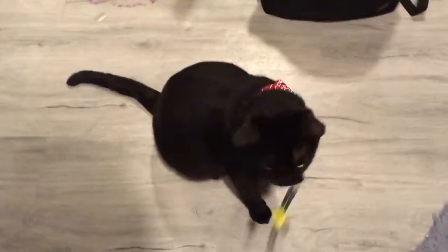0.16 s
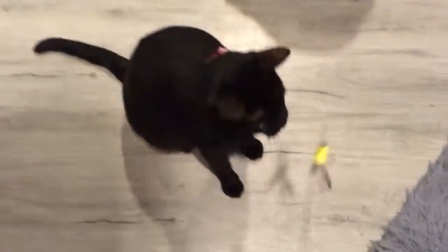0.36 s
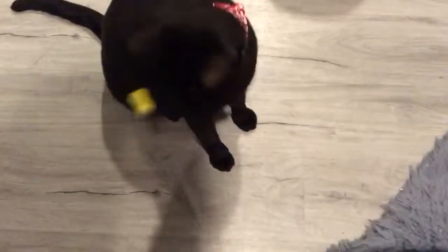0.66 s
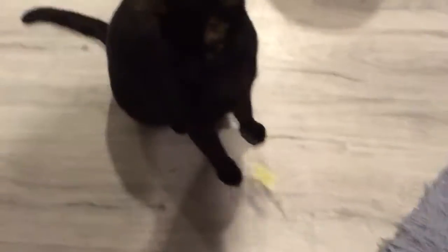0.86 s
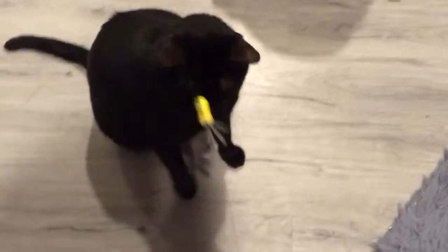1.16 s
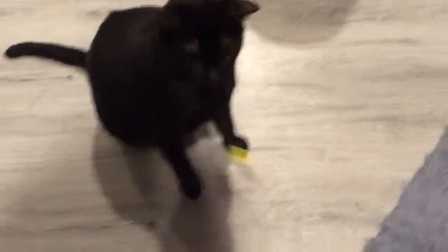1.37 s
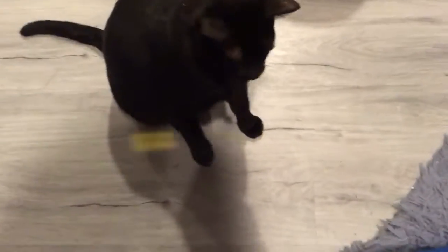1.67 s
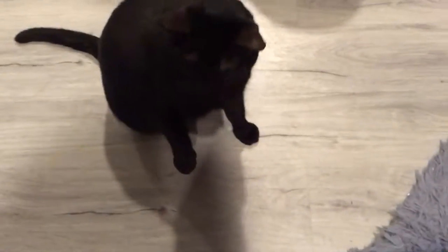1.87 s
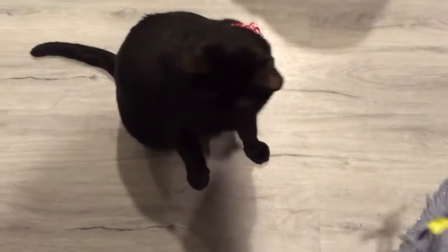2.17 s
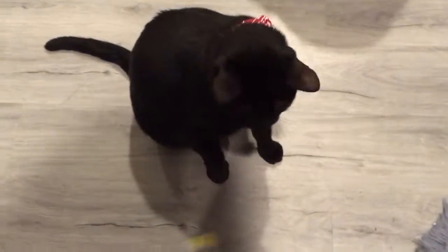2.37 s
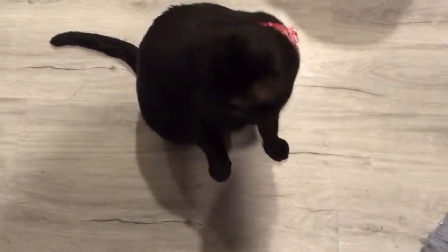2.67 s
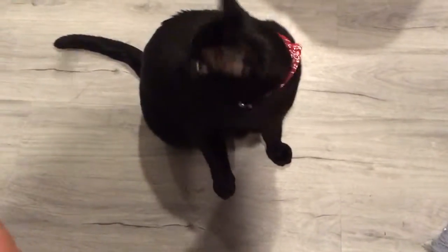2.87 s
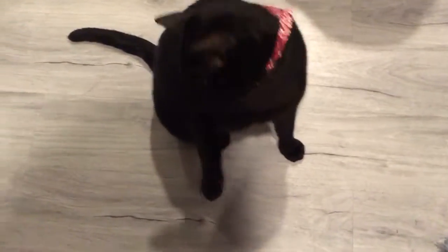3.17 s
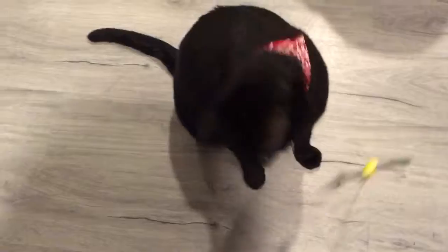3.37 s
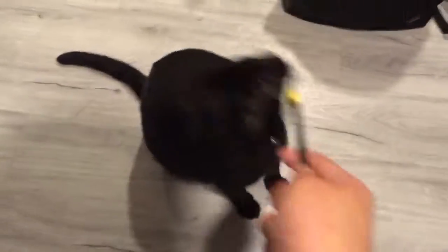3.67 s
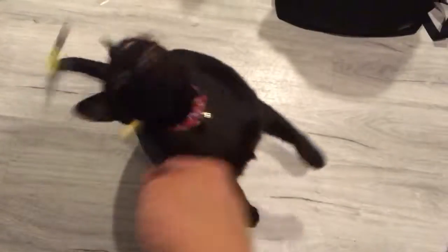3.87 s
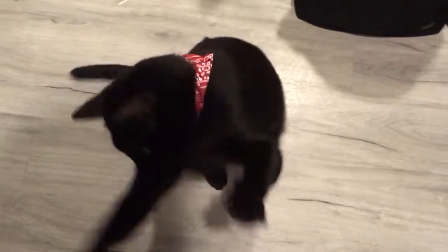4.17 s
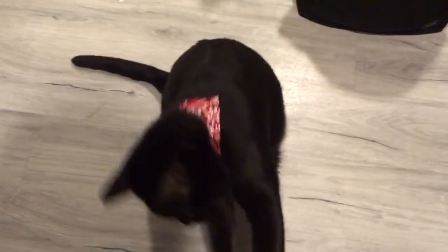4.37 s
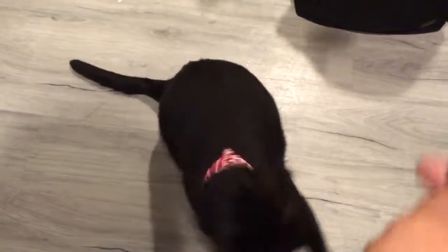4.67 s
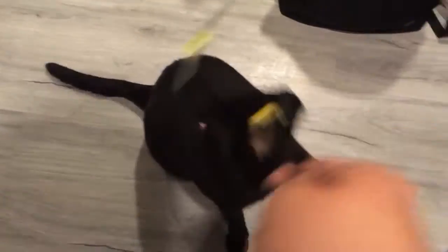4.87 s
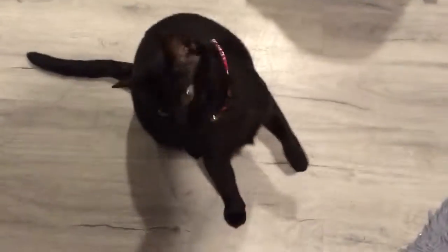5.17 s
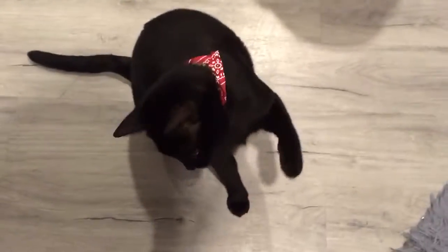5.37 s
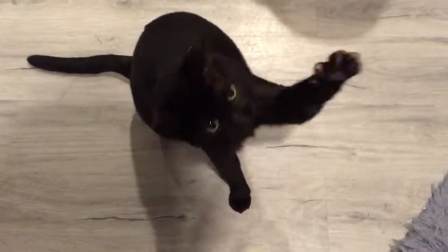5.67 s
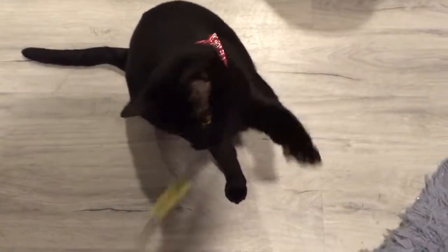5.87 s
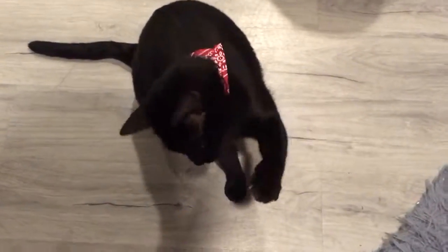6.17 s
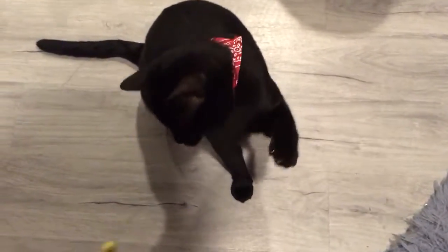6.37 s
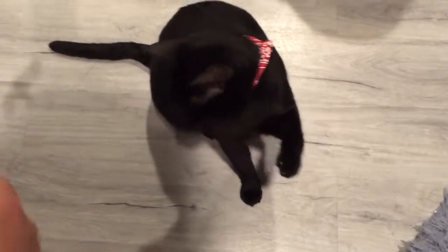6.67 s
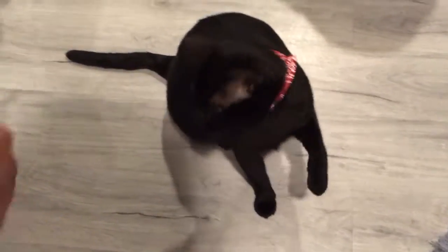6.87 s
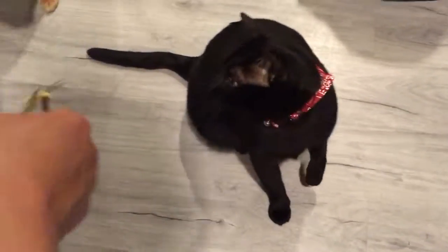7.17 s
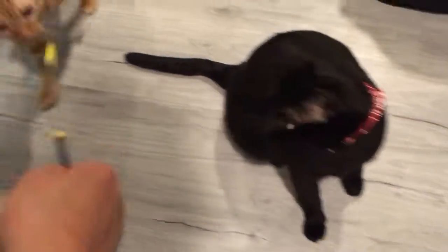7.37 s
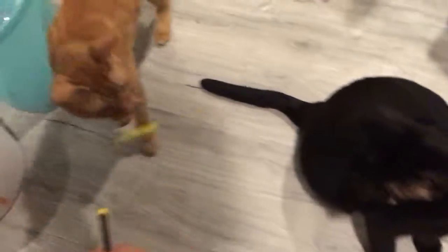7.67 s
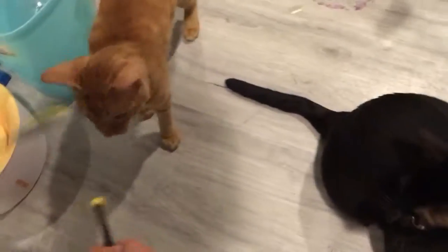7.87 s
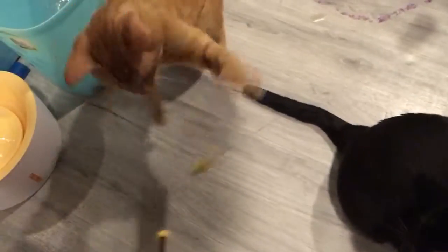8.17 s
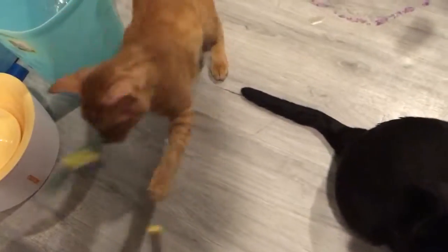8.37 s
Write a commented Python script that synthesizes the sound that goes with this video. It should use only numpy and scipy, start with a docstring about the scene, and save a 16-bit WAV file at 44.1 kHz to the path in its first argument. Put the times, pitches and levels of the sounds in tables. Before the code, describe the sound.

A small collar bell jingles in short, muffled shakes among dry taps and light scratches on a hard floor, over a low appliance hum.

```python
"""A small room with a laminate floor, where cats bat at a teaser toy close to a hand-held phone microphone.
Nearest is a slotted collar bell: its pellet strikes three groups of damped modes, with small rebounds.
Grainy noise bursts make the taps of toy and paws and some noisy clacks of the bell; claws add short
scratchy notes, hard landings knock the board, fur and string crackle and paws slide as lumpy noise.
Further back an appliance drones as resonant noise, with one low thump, under faint hiss and room echoes."""
import sys
import numpy as np
from scipy import signal
from scipy.fft import rfft, irfft
from scipy.io import wavfile
from scipy.ndimage import uniform_filter1d

SR = 44100
rng = np.random.default_rng(int(sys.argv[2]) if len(sys.argv) > 2 else 0)


def unload_audio(sound):
    """Save the sound as a 16-bit wav file, at the path given as the first command line argument."""
    columns = np.transpose(np.atleast_2d(sound))
    # keep every value between -1 and 1, then stretch to whole-number steps
    steps = np.round(np.clip(columns, -1, 1) * 32767)
    wavfile.write(sys.argv[1], SR, steps.astype(np.int16))


N = 375732  # samples


def gain_of(db):
    """Amplitude factor of a level in dB."""
    return 10 ** (np.asarray(db) / 20)


def evened(x):
    """Scales a signal to rms 1."""
    return x / np.sqrt(np.mean(x ** 2) + 1e-20)


def read(points, hz):
    """Reads a (frequency, value) curve, straight along log frequency."""
    point_hz, value = np.transpose(points)
    return np.interp(np.log(hz + 1), np.log(point_hz + 1), value)


def add(mix, start_s, sound):
    """Adds a sound to the mix in place, cut off where the mix ends."""
    part = mix[round(start_s * SR):][:len(sound)]
    part += sound[:len(part)]


def level(rows):
    """Gain over time of a (time_s, level_db) curve, near silent (-200 dB) outside it."""
    time_s, level_db = np.transpose(rows)
    return gain_of(np.interp(np.arange(N) / SR, time_s, level_db, -200, -200))


def coloured(x, points):
    """Shapes a signal by a (frequency_hz, level_db) spectrum, then scales it to rms 1."""
    hz = np.fft.rfftfreq(N, 1 / SR)
    return evened(irfft(rfft(x) * gain_of(read(points, hz)), N))


# resonances of the appliance drone: frequency_hz, width_hz (between the -6 dB points), share_db (relative)
DRONE_RESONANCES = [(47.4, 20, -60), (57.5, 5.9, -51.5), (69.4, 19, -51), (88.66, 3.8, -54),
                    (114.2, 11, -57), (139.6, 55, -60.5), (175.55, 6.3, -59), (203.8, 33, -66),
                    (242, 15, -65), (263.3, 6.8, -70), (296.5, 2.6, -67.5), (366.7, 6.5, -78)]
# low hum level, including a low handling or paw thump near 5.86 s: time_s, level_db (rms)
LOW_HUM_LEVEL = [(0.0, -46.5), (.8, -47.5), (2, -47), (4.08, -47.5), (5.4, -47.5), (5.74, -49.5),
                 (5.86, -43), (6, -46.5), (8.52, -46)]


def low_hum():
    """Noise excites each of the appliance's resonances, so the hum wavers; a brief rise makes the low thump."""
    hz = np.fft.rfftfreq(N, 1 / SR)
    power = np.zeros(len(hz))
    for mode_hz, width_hz, share_db in DRONE_RESONANCES:
        shape = 1 / (1 + (2 * (hz - mode_hz) / width_hz) ** 2) ** 2
        power += gain_of(2 * share_db) / width_hz * shape  # twice the dB makes a power
    hum = irfft(rfft(rng.standard_normal(N)) * np.sqrt(power), N)
    return level(LOW_HUM_LEVEL) * evened(hum)


# colour of the room's hiss: frequency_hz, level_db (relative, per Hz)
AIR_SPECTRUM = [(180, -15), (300, -3), (370, -11), (420, -7.5), (700, -17.5), (1050, -11), (2200, -23.5),
                (3700, -29), (5000, -32.5), (7000, -28), (10000, -29), (14500, -26.5), (16000, -20.5)]


def air():
    """Steady coloured noise: the faint hiss of the room."""
    air_db = -62  # rms
    return gain_of(air_db) * coloured(rng.standard_normal(N), AIR_SPECTRUM)


# how fast the room's echoes die in each band: frequency_hz, t60_s
ROOM_DECAY = [(1000, 0.35), (2600, 0.27), (7000, 0.2), (15000, 0.16)]


def room(x):
    """Sparse echoes of random sign, one in every 20 samples, each band dying at its own speed."""
    echoes = np.zeros(SR // 2)
    at = np.arange(200, SR // 2 - 20, 20)
    echoes[at + rng.integers(0, 20, at.shape)] = rng.choice([-1., 1.], at.shape)
    hz, t, bands = signal.stft(echoes, SR, nperseg=256)
    decay = gain_of(-60 * t / read(ROOM_DECAY, hz)[:, None])
    tail = signal.istft(bands * decay, SR, nperseg=256)[1]
    return signal.fftconvolve(x, tail / np.linalg.norm(tail))[:N]


# paws and bodies shuffle and slide over the floor: time_s, level_db (rms)
SLIDE_LEVEL = [(0, -64), (.24, -62), (.4, -66), (1.09, -68), (1.8, -64.5), (2.3, -70), (2.42, -64),
               (2.55, -68.5), (3.05, -67.5), (3.18, -64), (3.35, -66.5), (4.37, -67.5), (5.89, -64),
               (6.1, -67.5), (7.7, -65), (8.03, -63), (8.08, -51.5), (8.17, -55.5), (8.25, -63),
               (8.52, -62)]
# colour of the sliding: frequency_hz, level_db (relative, per Hz)
SLIDE_SPECTRUM = [(180, -45), (300, -4.5), (537, -3), (656, -2), (2000, -4), (5080, -14.5), (16000, -37.5)]


def slide():
    """Friction noise that comes in soft lumps under the stroke."""
    lumps = gain_of(2.0 * evened(uniform_filter1d(rng.standard_normal(N), 180)))
    friction = coloured(rng.standard_normal(N), SLIDE_SPECTRUM)
    return level(SLIDE_LEVEL) * evened(lumps * friction)


# fur and string brushing: time_s, level_db (rms, relative to BRUSH_DB)
BRUSH_LEVEL = [(0, -67), (.8, -69), (1, -82), (1.3, -70.5), (1.85, -69.5), (2.73, -82), (3.66, -69.5),
               (4.01, -74), (4.9, -62), (5.15, -71), (5.4, -65), (5.9, -71.5), (6.03, -65), (6.3, -85),
               (6.5, -65.5), (6.76, -72.5), (7.5, -69.5), (7.86, -72.5), (7.95, -65), (8.11, -63),
               (8.18, -56.5), (8.29, -65), (8.52, -67.5)]
# colour of the brushing: frequency_hz, level_db (relative, per Hz)
BRUSH_SPECTRUM = [(1500, -37.5), (4000, 2.5), (7000, 3), (10000, 3), (13000, 4), (16000, -0.5)]
BRUSH_DB = 2.0


def brush():
    """Fine hiss with sparse crackles of hairs and string, each dying away exponentially."""
    crackles_per_s, crackle_fade_s = 25., 0.0013
    size_db = 4.0 * np.minimum(rng.exponential(1, N), 3)
    crackle = gain_of(size_db) * (rng.random(N) < crackles_per_s / SR)
    crackle = signal.lfilter([1], [1, -np.exp(-1 / (crackle_fade_s * SR))], crackle)
    hiss = rng.standard_normal(N) * (1 + .9 * crackle)
    return gain_of(BRUSH_DB) * level(BRUSH_LEVEL) * coloured(hiss, BRUSH_SPECTRUM)


# harder landings knock the floorboard: start_s, level_db (gain on all the board's modes)
BOARD_KNOCKS = [(0.796, -43), (4.558, -57), (4.57, -46), (4.592, -55), (6.332, -52), (6.355, -43),
                (7.977, -47), (7.984, -49)]
# modes of the floorboard: frequency_hz, level_db (relative), t60_s
BOARD_MODES = [(332, 0, 0.013), (550, -13, 0.01), (915, 3, 0.012), (1427, 0.5, 0.013), (2310, -2, 0.016)]


def knocks():
    """The same dull, quickly damped board modes sound at every hard landing."""
    out, t = np.zeros(N), np.arange(2000) / SR
    board = sum(gain_of(db - 60 * t / t60) * np.sin(2 * np.pi * hz * t) for hz, db, t60 in BOARD_MODES)
    for start_s, level_db in BOARD_KNOCKS:
        add(out, start_s, gain_of(level_db) * board)
    return out


# claws touch the floor: start_s, level_db (relative to CLAW_DB), pitch_hz
CLAW_TOUCHES = [(.91, -56, 6300), (0.966, -46, 3500), (1.199, -52, 4660), (1.308, -45, 4320),
                (1.57, -50, 3100), (1.606, -54, 2400), (2.138, -54, 1710), (3.352, -51, 9100),
                (3.638, -48, 3870), (4.12, -45.5, 2770), (4.135, -48, 1190), (4.687, -52, 9300),
                (4.882, -44.5, 1950), (5.35, -50, 2740), (5.416, -46.5, 3760), (6.023, -37, 8600),
                (6.304, -49, 3700), (6.86, -55, 9200), (7.65, -55.5, 6500), (8.324, -50, 3668)]
CLAW_DB = 3.0


def claws():
    """One short scratchy note a touch: a damped tone roughened by the floor's grain."""
    out, t = np.zeros(N), np.arange(1000) / SR
    rise_s, t60_s = 0.002, 0.024
    for start_s, level_db, pitch_hz in CLAW_TOUCHES:
        grain = 1 + .6 * evened(uniform_filter1d(rng.standard_normal(len(t)), 30))
        fade = gain_of(level_db + CLAW_DB - 60 * t / t60_s)
        rise = 1 - np.exp(-t / rise_s)
        add(out, start_s, fade * rise * grain * np.sin(2 * np.pi * pitch_hz * t))
    return out


def faint_taps():
    """Small touches fall by chance through the play, as rows like the clear taps."""
    per_s, loudest_db, body_db = 3.5, -63, -12
    bright_hz, contact_ms = (5500, 14500), (1.5, 9)  # ranges
    when, size, bright, touch = rng.random((round(per_s * N / SR), 4)).T
    return list(zip(when * N / SR,
                    loudest_db - 6 * size,
                    np.interp(bright, (0, 1), bright_hz),
                    body_db + 0 * when,
                    np.interp(touch ** 2, (0, 1), contact_ms)))  # the square favours short touches


# toy and paws on the floor, and some noisy clacks of the bell:
# start_s, level_db (rms in 3400 Hz at the brightest, before the shell's colour),
# brightest_hz, body_db (at 2200 Hz, relative to the brightest), contact_ms
CLEAR_TAPS = [(0.0185, -59, 11400, -30, 2.9), (0.2676, -55.5, 12000, -18, 21),
              (0.2894, -49.5, 13800, -24, 11), (0.4195, -56, 5900, -23, 6), (0.664, -57.5, 12000, -8, 2.4),
              (0.7993, -38.5, 13800, -12, 14), (0.8085, -34.5, 13800, -23, 6.1),
              (0.9305, -60, 13800, -19, 2.4), (0.9605, -55, 10120, -17, 5.4), (1.0388, -64, 8900, -11, 2),
              (1.2012, -60, 12500, -28, 2.6), (1.247, -58.5, 13800, -14, 22), (1.265, -60, 12500, -17, 30),
              (1.4429, -65, 10000, -3, 3.4), (2.1403, -57, 4870, 0, 5.8), (2.2167, -61, 13800, -21, 2.3),
              (2.4167, -64.5, 8900, 7.5, 2.3), (2.4267, -62, 13800, -3, 1.9), (2.6812, -61, 5900, -17, 10),
              (2.7073, -62, 11000, -14, 2.9), (2.7963, -60, 11400, -21, 1.3),
              (2.992, -60.5, 5900, -29, 2.3), (3.388, -61, 10000, -22, 2.8), (3.492, -57, 13800, -20, 1.5),
              (3.6143, -63, 13800, -15, 1.9), (3.645, -53, 13800, -9, 11), (3.683, -59, 13800, -0.5, 7.2),
              (3.9224, -43, 6450, -35, 2), (4.0806, -56, 13800, -29.5, 2.4), (4.0974, -34, 13800, -27, 5),
              (4.192, -58, 13800, -13, 5.9), (4.3487, -50.5, 11300, -27, 6.4), (4.546, -54, 12500, -6, 1.3),
              (4.558, -40.5, 5860, -7, 6.8), (4.5655, -43, 13800, -8.5, 7),
              (4.593, -31.5, 13500, -8.5, 6.7), (4.737, -45.5, 5900, -46, 9.9),
              (5.198, -39.5, 5740, -44, 9.7), (5.3486, -54.5, 8900, -3, 7.1),
              (5.361, -58.5, 11400, -3.5, 3.6), (5.452, -57, 5900, -15, 2.7),
              (5.8203, -55.5, 13800, -23, 2.8), (5.9645, -58, 12000, -19, 7.6),
              (5.9868, -58, 13800, -23, 7.4), (6.024, -51.5, 8900, -6.5, 8.5),
              (6.0482, -48.5, 13800, -15.5, 8.6), (6.2009, -59, 13800, -21.5, 2),
              (6.2426, -63, 13800, -12, 3), (6.2843, -63.5, 5900, -19, 2.1),
              (6.3114, -54.5, 11400, -24.5, 1.5), (6.3327, -18, 11000, -24.5, 4.8),
              (6.355, -32.5, 11000, -12, 3.3), (6.3704, -55, 11400, -24, 8), (6.6633, -65, 13800, 2, 2.1),
              (6.8773, -57, 5850, -17.5, 2.4), (6.9307, -62, 14100, -27, 1.8),
              (7.3166, -53, 8800, -26, 2.6), (7.3797, -60, 11300, -27, 8.4), (7.5093, -54, 11400, -29, 1.3),
              (7.7863, -59, 13800, -22, 10), (7.9748, -38, 12000, -11, 9.26),
              (8.0012, -40, 13000, -11.5, 4.9), (8.037, -50, 11400, -7, 6.9), (8.055, -53, 5900, -2, 8.6),
              (8.3832, -61.5, 11400, -14, 3.5), (8.4919, -55, 13800, -21, 3),
              (8.5068, -49.5, 6100, -20, 11)]
# a hollow shell like the toy's colours every tap: frequency_hz, level_db
SHELL_COLOUR = [(2300, 0), (3600, -2), (6300, 1.5), (8500, -1.5), (11600, 0.5), (14000, -3), (16000, 3)]
TAP_FALL_DB = 12  # per octave above the brightest band


def taps(landings):
    """Light bodies tap without a clear ring: a grainy chatter while they touch, then a quick end."""
    out, t, hz = np.zeros(N), np.arange(4096) / SR, np.fft.rfftfreq(4096, 1 / SR)
    end_t60_s = 0.018
    lead = 64  # samples of room ahead of the burst for the filter's spread
    for start_s, level_db, bright_hz, body_db, contact_ms in landings:
        contact_s = contact_ms / 1000
        chatter = gain_of(2.0 * rng.standard_normal(len(t) // 32).repeat(32))
        held = t / contact_s  # in contact times
        fade_db = -4.0 * held - 60 * np.maximum(t - contact_s, 0) / end_t60_s
        touch = (1 - np.exp(-held / .12)) * gain_of(fade_db)
        burst = rng.standard_normal(len(t)) * chatter * touch
        # rms 1 in each 3400 Hz of the noise during the contact
        burst /= np.sqrt(np.mean(burst[:round(contact_s * SR)] ** 2) * 3400 / (SR / 2))
        tone = [(300, body_db - 23), (900, body_db - 7.5), (2200, body_db), (bright_hz, 0),
                (16000, -TAP_FALL_DB * np.log2(16000 / bright_hz))]
        tone_db = read(tone, hz) + read(SHELL_COLOUR, hz)
        tap = irfft(rfft(burst) * gain_of(tone_db))
        add(out, start_s - lead / SR, gain_of(level_db) * np.roll(tap, lead))
    return out


# spells in which the pellet also rolls about with faint strikes:
# start_s, end_s, low_ring_db (middle of the scatter), freedom (from the fur, a mean factor on t60)
ROLLING_SPELLS = [(0.099, .16, -72, .7), (0.304, .49, -72, .7), (1.534, 1.64, -66, 0.4),
                  (2.26, 2.36, -69, 0.51), (2.851, 3.4, -63, 0.48), (3.523, 3.76, -69, 0.85),
                  (3.846, 4.359, -65, .8), (4.73, 5.079, -60, .85), (5.151, 5.554, -67, .72),
                  (5.72, 6.27, -66, 0.83), (6.487, 6.704, -72, 0.68)]


def rolling():
    """Faint strikes at chance moments of each rolling spell, as rows like the clear strikes."""
    per_s, scatter_db = 16, 4
    high_ring_db = -7.5  # under the low ring, before the scatter
    rows = []
    for start_s, end_s, ring_db, _ in ROLLING_SPELLS:
        length_s = end_s - start_s
        when = rng.random(round(per_s * round(length_s, ndigits=1)))
        low_db, high_db = ring_db + scatter_db * rng.standard_normal((len(when), 2)).T
        rows += zip(start_s + when * length_s, low_db, high_db + high_ring_db)
    return rows


def freedom(start_s):
    """How freely the bell hangs in the spell last begun, varied by a share from strike to strike."""
    scatter = .15
    spell = max(np.searchsorted([row[0] for row in ROLLING_SPELLS], start_s) - 1, 0)
    return ROLLING_SPELLS[spell][-1] * (1 + scatter * rng.standard_normal())


# clear pellet strikes: start_s, low_ring_db, high_ring_db (levels before the flutter)
BELL_STRIKES = [(0.1151, -63, -74), (0.313, -55, -73), (0.4189, -63, -74), (0.4683, -63, -71),
                (1.5467, -54, -68), (1.558, -58, -71), (1.6316, -52, -67), (2.268, -57, -78),
                (2.9273, -50.5, -70), (2.9424, -51, -56), (2.9606, -57, -81), (2.9798, -51.5, -51.5),
                (2.9931, -54, -76), (3.0884, -66, -75), (3.1073, -69, -80), (3.1642, -68.5, -60),
                (3.18, -56, -65), (3.245, -61, -63), (3.296, -51.5, -60), (3.532, -53, -75),
                (3.5754, -74, -59), (3.638, -55, -43), (3.661, -47, -51), (3.7, -57, -67),
                (3.7368, -64, -74), (3.8613, -46.5, -38), (3.8865, -54, -43), (3.922, -35, -37.5),
                (3.9793, -50.5, -60), (4.0438, -55, -61), (4.066, -53, -63), (4.089, -34.5, -50),
                (4.0982, -33.5, -36.5), (4.1428, -43, -51), (4.1936, -51.5, -69), (4.2563, -58, -59),
                (4.446, -63, -63), (4.7355, -50.5, -51), (4.7846, -59, -60), (4.8504, -60, -63),
                (4.8986, -55, -46), (4.936, -47, -41.5), (4.9489, -45.5, -45), (4.971, -48, -60),
                (5.017, -46, -54), (5.033, -47, -51), (5.058, -60, -61), (5.19, -53, -53),
                (5.1988, -45, -47), (5.2063, -63, -38), (5.2588, -49, -38.5), (5.272, -43.5, -46.5),
                (5.304, -57, -57), (5.346, -50, -61), (5.4136, -52.5, -59), (5.453, -56, -75),
                (5.516, -60, -76.5), (5.734, -57, -82), (5.799, -57, -78), (5.8551, -58, -56),
                (5.8793, -53.5, -55), (5.9232, -50, -64), (5.9534, -63, -66), (5.9874, -49, -63),
                (6.0077, -47.5, -59), (6.083, -49.5, -60), (6.142, -55.5, -73), (6.2057, -56, -80),
                (6.2416, -59, -77), (6.5015, -60, -63), (6.54, -64, -66), (6.69, -63, -62.5)]
# modes of the bell in three groups, low ring, high ring, clack; close pairs beat:
# frequency_hz (before the scatter), level_db (relative, before the scatter), t60_s (at a freedom of 1)
BELL_MODES = [
    [(4490, -11, .035), (4655, 0, .11), (4712, -5, .09), (4810, -11, .035), (5035, -15, .04)],
    [(11287, 0, .16), (11520, -15, .09), (11610, -5, .07), (13950, -26, .03), (14800, -24, .03)],
    [(5300, -4, .035), (5800, -2, .045), (6200, 0, .05), (6700, -3, .04), (7400, -8, .03), (8400, -12, .02)],
]
# pitch scatter of each group from strike to strike, as a share
PITCH_SCATTER = [0.0016, 0.00019, 0.015]
# how strongly the pellet's small rebounds drive each group, as a factor
REBOUND_SHARE = [0.24, 0.088, 0.94]
# how far the pellet's grit smears each group, as a factor
GRIT_SHARE = [.3, .04, 1.6]
CLACK_DB = -8  # the wall clack, under the low ring


def bell():
    """Strikes and rebounds ring three groups of modes; the landing spot varies their shares, fur chokes them."""
    out, t = np.zeros(N), np.arange(7000) / SR
    rise = 1 - np.exp(-t / 0.00095)
    spot_scatter_db, first_lag_s, lag_spread_s = 5.2, 0.0027, 0.028
    for start_s, low_db, high_db in BELL_STRIKES + rolling():
        group_db = low_db, high_db, low_db + CLACK_DB
        free = freedom(start_s)
        when, size = rng.random((2, 6))  # six rebounds, the late ones weaker
        lags_s = first_lag_s + when * lag_spread_s * free
        sizes = size * (1 - when)
        scrape = evened(uniform_filter1d(rng.standard_normal(len(t)), 40))
        groups = zip(BELL_MODES, group_db, PITCH_SCATTER, REBOUND_SHARE, GRIT_SHARE)
        for modes, strike_db, loose, rebound, grit in groups:
            hz, mode_db, t60 = np.transpose(modes)[:, :, None]
            spot, bend = rng.standard_normal((2, *hz.shape))
            fade = gain_of(mode_db + spot_scatter_db * spot - 60 * t / (t60 * max(free, .1)))
            tones = np.sin(2 * np.pi * hz * (1 + loose * bend) * t)
            ring = rise * (1 + grit * scrape) * (fade * tones).sum(0)
            jingle = ring.copy()
            for lag_s, part in zip(lags_s, sizes):
                add(jingle, lag_s, rebound * part * ring)
            # the blow sets the strength of the first 10 ms, however the modes share it
            strength = np.sqrt(2 * np.mean(jingle[:441] ** 2))
            add(out, start_s, gain_of(strike_db) * jingle / strength)
    # the rolling pellet brushes the wall and makes the ring flutter
    wander = uniform_filter1d(uniform_filter1d(rng.standard_normal(N), 150), 150)
    flutter_db = 1.8 * evened(wander)
    return out * gain_of(flutter_db)


def scene():
    """Close sounds, their room echoes and the background, on one channel."""
    landings = CLEAR_TAPS + faint_taps()
    ring, board, touches = bell(), knocks(), claws()
    wet = room(gain_of(-15.0) * ring + gain_of(-10.5) * board + gain_of(-9.5) * touches)
    draws = 4  # several independent noise draws are summed, so that the echoes of the taps sound smooth
    tap_echoes = sum(room(taps(landings)) for _ in range(draws)) / np.sqrt(draws)
    wet += gain_of(-7.5) * tap_echoes
    close = ring + taps(landings) + board + touches + brush() + slide()
    return (close + wet + low_hum() + air())[None]


# dips from the phone's case and port: frequency_hz, width_hz (at half the dip's dB), level_db
MICROPHONE_DIPS = [(4580, 1320, -4), (7680, 1300, -3.5), (10400, 310, -8)]
EDGE_HZ = 15800  # upper band limit


def record(dry):
    """The dips of the phone microphone, then the band limit."""
    hz = np.linspace(0, SR / 2, 513)
    dips_db = sum(db / (1 + (2 * (hz - f) / width) ** 2) for f, width, db in MICROPHONE_DIPS)
    # minimum phase keeps the root of the gain, hence twice the dB
    mic = signal.minimum_phase(signal.firwin2(511, hz, gain_of(2 * dips_db), fs=SR))
    heard = signal.oaconvolve(dry, mic[None])[:, :N]
    band_limit = signal.firwin(511, EDGE_HZ, window=("kaiser", 9), fs=SR)
    return signal.oaconvolve(heard, band_limit[None], "same")


dry = scene()
out = record(dry)
unload_audio(out)
```